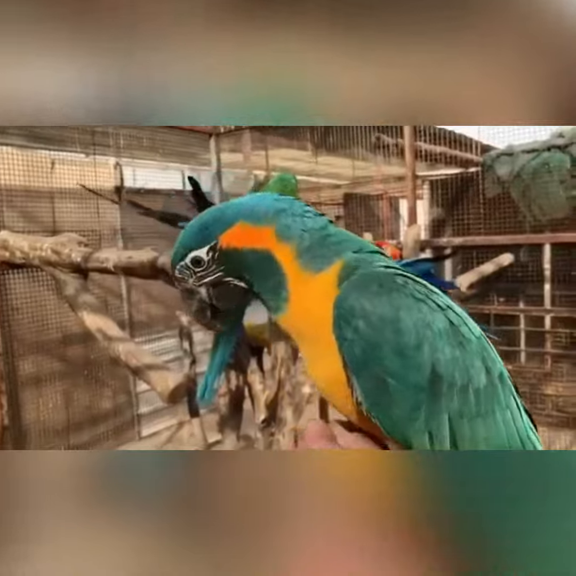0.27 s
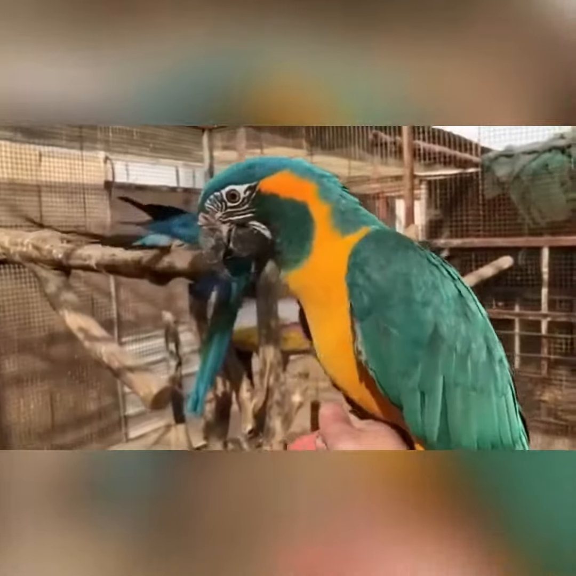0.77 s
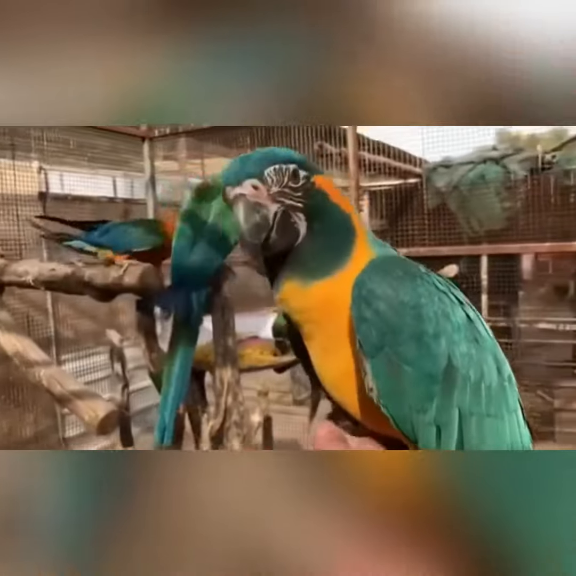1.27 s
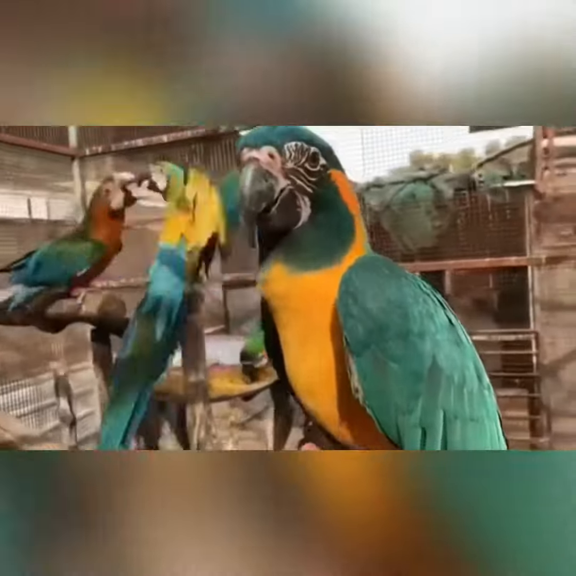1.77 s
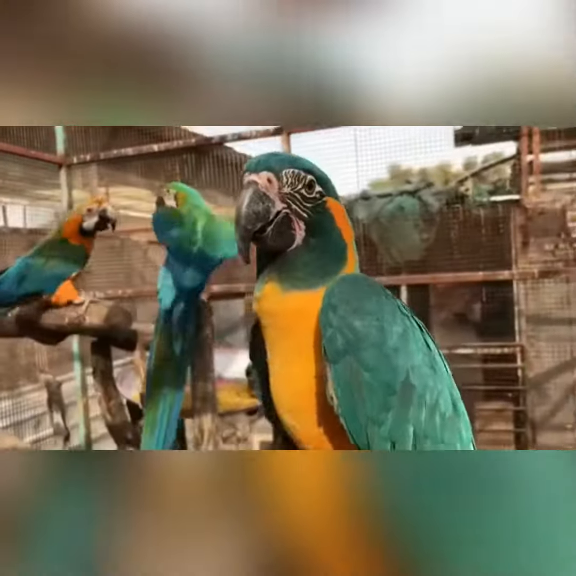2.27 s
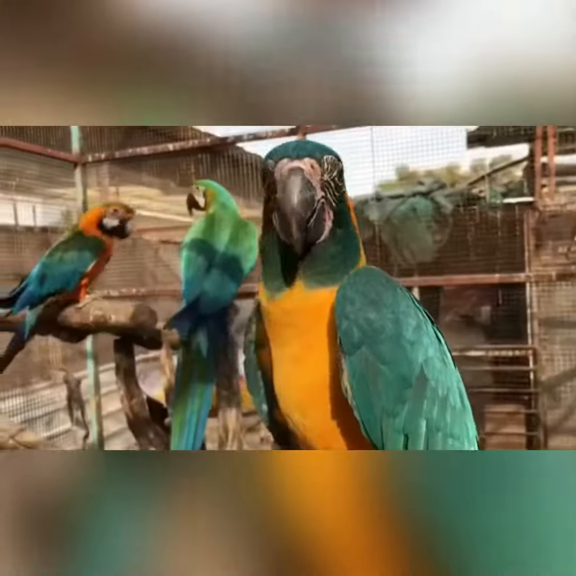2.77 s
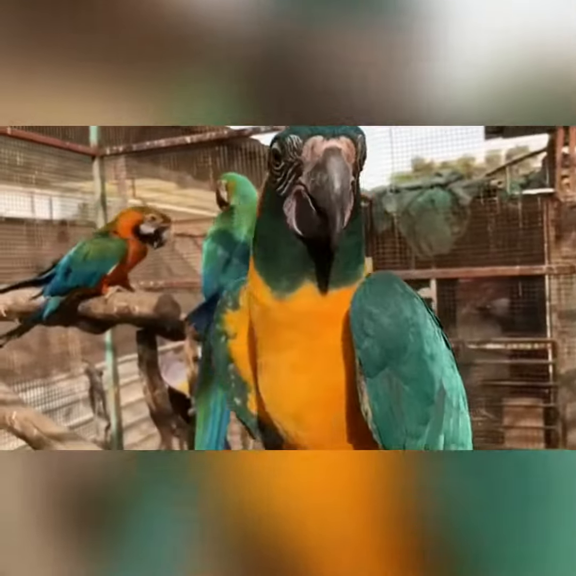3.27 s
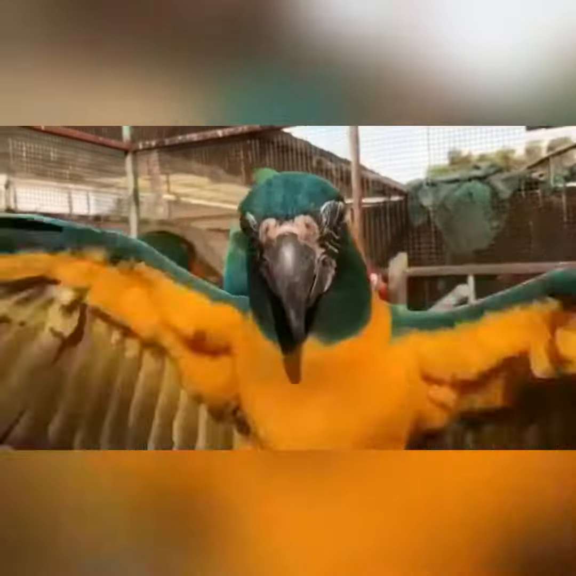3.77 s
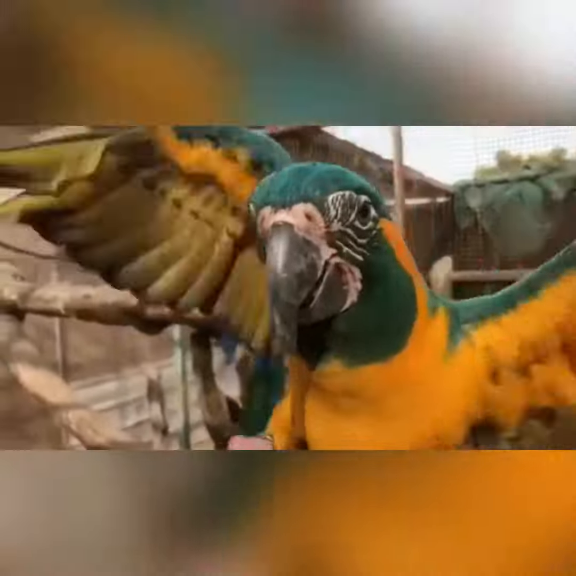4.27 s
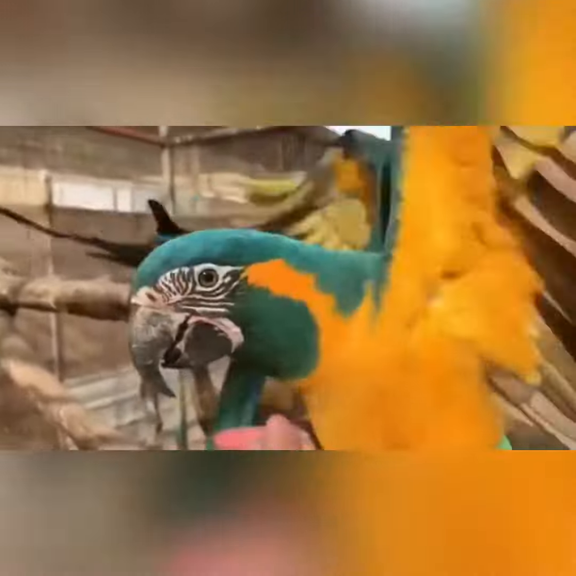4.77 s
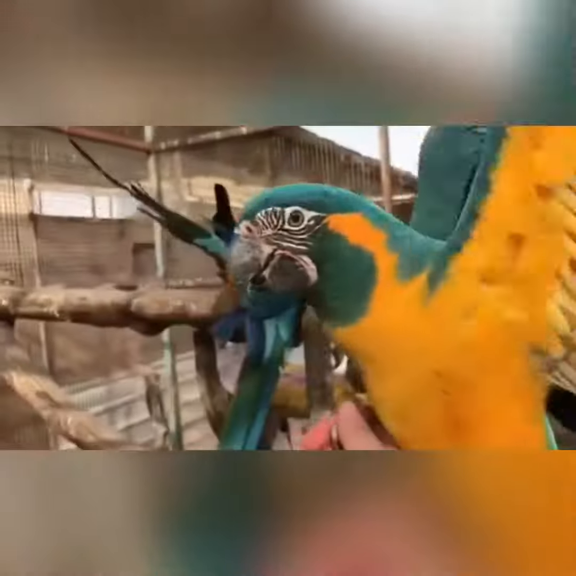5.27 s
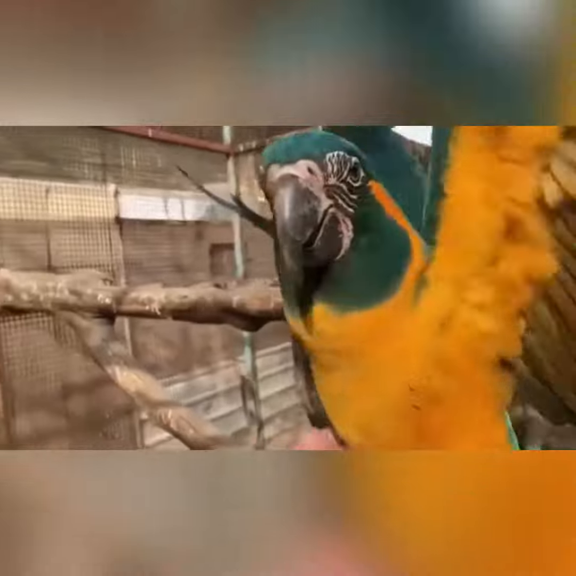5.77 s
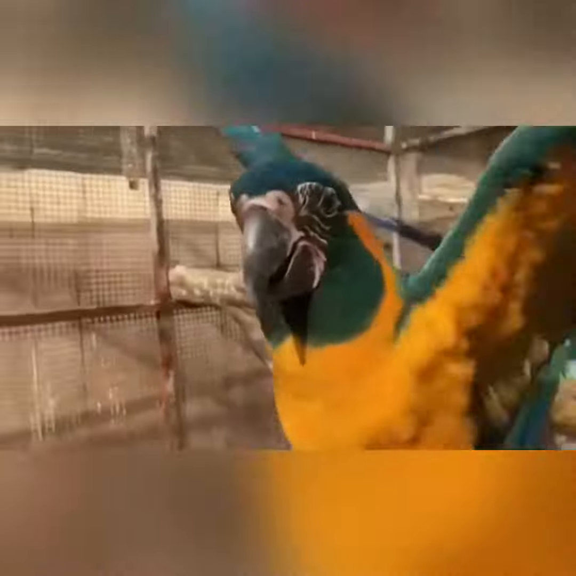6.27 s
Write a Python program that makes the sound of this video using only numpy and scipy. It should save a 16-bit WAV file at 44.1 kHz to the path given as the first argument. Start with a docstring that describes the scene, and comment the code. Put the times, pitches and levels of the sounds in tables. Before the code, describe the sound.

Gritty rubbing and faint airy hiss open with the tail of a far bird call. A large parrot near the microphone squawks twice, first throaty and climbing, then a piercing, cracking screech, both reflected by hard metal walls. Afterwards come uneven scuffs, brief far whistles, a soft low bump, a very sharp bright click with a thump, and thin rising chirps near the end.

```python
"""Gritty scraping, a faint hiss, low wind and a far bird call come first; far whistles join in.
A macaw close by then squawks twice: rough pulses and breath shaped by its throat, beak and skull.
Short noise bursts tick close by, and one sharp snap thumps the microphone with dying low swings.
Scrapes are dense random grains with brighter scuffs; far birds are wavering near-sines.
The birds echo in a wire and sheet-metal aviary: quick echoes, then a ringing tail."""
import sys
import numpy as np
from scipy import signal
from scipy.io import wavfile
from scipy.ndimage import uniform_filter1d

SR = 44100
rng = np.random.default_rng(int(sys.argv[2]) if len(sys.argv) > 2 else 0)


def transcribe(u):
    """Save the signal u as a 16-bit wav file named by the first command-line argument.

    u: samples, shape (n,) or (channels, n), limited to [-1, 1]; the rate is SR.
    q: integer samples, one column per channel.
    """
    v = np.clip(np.atleast_2d(u).T, -1, 1)
    q = np.round(v * 32767).astype(np.int16)
    wavfile.write(sys.argv[1], SR, q)


N = 286958

# Colour of the far hiss: (frequency [Hz], relative level per Hz [dB])
AIR_COLOUR = [(15, -31), (25, 9.5), (71, 8), (480, -9), (661, 0.5), (2370, -3), (2710, -11), (3830, -4),
              (8740, -39), (10500, -34), (13000, -13), (14500, -23)]
# Colour of the low wind and rumble: (frequency [Hz], relative level per Hz [dB])
WIND_COLOUR = [(15, -31), (25, -27), (48, -6.5), (102, -7), (151, -10), (260, -8), (400, -8.5), (520, -31),
               (880, -120)]
AIR_DB, WIND_DB = -48.5, -54
RUMBLE_DB = -10.5   # against the body of the scraping

# Strength of the scraping: (time [s], body level [dB], grit level [dB])
SCRAPE_LEVELS = [(0, -47.5, -47), (.3, -47.5, -60.5), (.65, -47, -48.5), (0.999, -41.5, -51),
                 (1.12, -63, -61.5), (1.35, -36, -47.5), (1.9, -62.5, -58), (2.09, -37, -38),
                 (2.23, -44.5, -48.5), (2.43, -48, -56), (2.65, -39.5, -43.5), (3.22, -37.5, -41),
                 (3.55, -47, -49.5), (3.82, -46.5, -57.5), (3.95, -37, -36.5), (4.1, -43, -47),
                 (4.75, -47, -47.5), (5.13, -36, -41.5), (5.46, -49, -51), (5.95, -79, -54),
                 (6.15, -42, -46), (6.5, -56.5, -55)]
# Colour of the dull body: (frequency [Hz], relative level per Hz [dB])
BODY_COLOUR = [(88, -41), (150, -10), (356, -14.5), (538, -4), (945, -3), (2100, 0), (2340, -2.5),
               (2840, -3), (4000, -5), (5200, -18), (8800, -120)]
# Colour of the bright grit: (frequency [Hz], relative level per Hz [dB])
GRIT_COLOUR = [(1470, -59), (2500, 3.5), (3030, -3), (5030, 1.5), (5870, -11.5), (7650, 5), (8670, -12.5),
               (13400, -13.5), (14500, -28)]
# Ringing tones in the scrape: (frequency [Hz], width [Hz], strength before wavering [dB])
SCRAPE_RINGS = [(944, 23, -6), (2315, 34, 4.5), (5980, 840, -8)]
# Scuffs, bright starts of a scrape: (time [s], nominal peak [dB], time to fall 60 dB [s], rise [s])
SCUFFS = [(0.72, -17.5, 0.49, 0.038), (1.2555, -32.5, 1, 0.015), (2.3, -20.5, 0.25, 0.034),
          (2.442, -26, 0.14, 0.011), (2.5885, -31.5, 0.34, 0.0059), (2.6963, -20, 0.29, 0.0057),
          (2.814, -26.5, 0.51, 0.0086), (2.889, -17.5, 0.2, 0.024), (3.2, -25.5, 0.18, 0.017),
          (3.6194, -35.5, 0.97, 0.013), (3.763, -33, 0.52, .008), (3.81, -31, 0.24, 0.0046),
          (4.196, -19, 0.38, 0.05), (4.859, -25, 0.19, .007), (4.9546, -31.5, 0.47, 0.0061),
          (5.0809, -25, 0.53, 0.013), (6.075, -22.5, 0.49, 0.0083)]
SCUFF_CREST_DB = 9   # a nominal peak stands this far above the average level
RING_WAVER_DB = 3.5

# Tail of a far call, before wavering: (time [s], lowest pitch [Hz], level [dB])
FAR_CALL = [(0, 1126, -42), (.03, 1235, -55.5), (.08, 1235, -64)]
# Tones stacked in the far call: (multiple of the pitch [-], added level [dB])
FAR_OVERTONES = [(1, 0.5), (2, 1.5), (3, -0.5)]
# Far whistles, before wavering: (start [s], turn [s], end [s], pitch at start [Hz], at turn [Hz],
# at end [Hz], level at turn [dB])
WHISTLES = [(0.113, .135, .18, 1917, 1730, 1670, -45), (.19, .235, .29, 3200, 3610, 3300, -46),
            (2.406, 2.471, 2.56, 1770, 1836, 1800, -46), (2.6, 2.63, 2.665, 1890, 1770, 1880, -46),
            (2.6, 2.622, 2.65, 3700, 3660, 3300, -43.5), (5.731, 5.774, 5.825, 2700, 3750, 2690, -43),
            (5.801, 5.824, 5.865, 2350, 2294, 2340, -49.5), (5.825, 5.86, 5.895, 3450, 3280, 3400, -54),
            (5.882, 6.023, 6.06, 3510, 5560, 5430, -48.5), (6.16, 6.322, 6.41, 4870, 6430, 6380, -49.5)]
WHISTLE_START_DB, WHISTLE_END_DB = -7, -11   # against the level at the turn

# Sheet metal ringing in the echo tail: (frequency [Hz], width [Hz], strength [dB])
ROOF_RINGS = [(978, 30, 6), (1690, 47, 8.5), (2164, 26, 7.5), (2560, 31, 6), (2780, 33.5, -7),
              (3540, 50, 8), (4650, 33, 9.5)]
EARLY_DB, EARLY_T60_S = -4, 0.15   # strength and time to fall 60 dB
LATE_DB, LATE_T60_S = -23.5, 1.12
FAR_WET_DB = 5   # far birds excite the room more than they are heard direct

# Ticks: (time [s], level before the fade [dB], centre [Hz])
TICKS = [(0.23, -27, 5000), (2.1166, -29, 5000), (4.6146, -17, 6770), (5.9718, -31, 10000),
         (6.324, -31.5, 10000)]
# Knocks near the microphone, the bright one is the snap:
# (time [s], level before the fade [dB], frequency [Hz], time to fall 60 dB [s])
THUMPS = [(3.49, -35, 260, .1), (4.6157, -19, 1296, 0.013), (4.6184, 3, 8000, .0006),
          (4.6195, -30, 170, .04), (4.6243, -22, 58, .09), (5.066, -33, 60, 0.09)]
TICK_T60_S = 0.021

# Two squawks, before dips and roughness: (time [s], pitch [Hz], level [dB], roughness [0-1],
# beak opening as second-resonance strength [dB], first resonance [Hz], second resonance [Hz])
SQUAWKS = [
    [(.305, 276.8, -53, .1, -12, 1400, 1750), (.325, 276.6, -31.5, 0.083, 0, 1250, 1650),
     (.35, 257, -29, 0.55, 0, 950, 1930), (.372, 291.2, -21, 0.83, -4, 1250, 1970),
     (.382, 275, -18, .25, -13, 1590, 2240), (.41, 329.2, -16, 0.26, -7, 1190, 2150),
     (.44, 375.6, -17, 0.4, -2.5, 1360, 2250), (.47, 430, -12.5, 0.41, -1, 1430, 2240),
     (.49, 434, -11, 0.15, -2, 1480, 2210), (.522, 403.1, -14, 0.21, -0.5, 1340, 2220),
     (.535, 426, -31, .4, 14, 1330, 2300), (.562, 416.7, -47, 0.32, 4, 1600, 2100)],
    [(1.41, 795.6, -45, 0.38, -15, 780, 1500), (1.423, 784, -24.5, 0.4, -14, 780, 1500),
     (1.44, 752.8, -12.5, 0.57, 5, 766, 1420), (1.455, 812, -15, 0.67, 3, 850, 1550),
     (1.48, 927.6, -10, 0.44, 8.5, 980, 1940), (1.52, 1013, -8.5, 0.56, 6.5, 1150, 2000),
     (1.562, 976, -11, 0.16, 17, 1390, 1840), (1.579, 963, -12.5, 0.86, 0, 1270, 1880),
     (1.592, 952, -29, 0.87, -18, 1200, 1900), (1.61, 940, -51, 0.72, 0, 1100, 1900)],
]
# Fixed skull resonances: (frequency [Hz], width [Hz], strength before each squawk's change [dB])
SKULL = [(750, 600, -11), (4500, 500, -12), (5700, 900, -20), (8200, 1500, -28), (12800, 2000, -26)]
# Change to the skull, a row a squawk: (strength [dB], tilt above 4.5 kHz [dB per octave])
SHRILL = [(-3, -4), (3, 2)]
# Bursts in the first squawk, each after a fade: (burst time [s], depth of the fade [dB])
CATCHES = [(0.376, 8), (.404, 19), (0.434, 27), (0.464, 10), (.489, 13.5)]
# Throat filter widths for one pass, a row a squawk: (first [Hz], second [Hz], third [Hz], fourth [Hz])
THROAT_WIDTHS = [(350, 460, 830, 960), (775, 1270, 1860, 330)]
# Third and fourth throat resonance, a pair of rows a squawk: (start [Hz], end [Hz])
UPPER_GLIDES = [
    [(3400, 3540), (4650, 4610)],
    [(3400, 3350), (5100, 6400)],
]
# Time the upper pair takes to glide, an entry a squawk: (time [s])
UPPER_GLIDE_TIMES = [0.16, 0.083]
# Strength of the upper pair at opening 0, before the fourth is lowered: (level [dB])
UPPER_LEVELS = [-3.5, -1]
# Strength lost by every second pulse outside the voice break, an entry a squawk: (share [0-1])
WEAK_PULSES = [0, 0.19]
UPPER_FOLLOWS, FOURTH_DB = .6, -4   # share of the opening; fourth resonance against the third
SAG, SAG_S, CATCH_FADE_S = .12, 0.031, 0.011   # share the pitch sinks before a burst; times
BREAK_S, BREAK_END_S, BREAK_LIFT = 1.524, 1.564, 1.25   # voice break; jump of the second resonance

NOTCH_HZ, NOTCH_WIDTH_HZ, NOTCH_SHARE = 2708, 136, 0.35
CUTOFF_HZ = 14700


def from_db(db):
    """Turn a level in dB into a gain."""
    return 10 ** (np.asarray(db) / 20)


def rms_one(x):
    """Scale a sound to an average (rms) strength of 1."""
    return x / np.sqrt(np.mean(x ** 2) + 1e-20)


def in_time(rows):
    """Draw a table as smooth curves; return the first sample and one curve a column."""
    s, *columns = np.transpose(rows)
    first = int(s[0] * SR)
    t = np.arange(first, min(N, int(s[-1] * SR))) / SR
    return first, [np.interp(t, s, column) for column in columns]


def drift(rate, size=N):
    """Wander by chance: noise at every 8th sample, smoothed twice up to about rate Hz; spread 1."""
    r = np.exp(-16 * np.pi * rate / SR)
    noise = rng.standard_normal(size // 8 + 1002)
    slow = signal.lfilter([1], [1, -2 * r, r * r], noise)[1000:]   # drop the filter's run-in
    return np.interp(np.arange(size) / 8, np.arange(len(slow)), rms_one(slow))


def poles(hz, width_hz):
    """Make the filter of a resonance with gain 1 on top."""
    r = np.exp(-np.pi * width_hz / SR)
    return (1 - r * r) / 2 * np.array([1, 0, -1]), [1, -2 * r * np.cos(2 * np.pi * hz / SR), r * r]


def moving_resonance(x, hz, width_hz):
    """Filter with a resonance whose centre is updated every 64 samples."""
    out, state = np.zeros(len(x)), np.zeros(2)
    for i in range(0, len(x), 64):
        out[i:i + 64], state = signal.lfilter(*poles(hz[i], width_hz), x[i:i + 64], zi=state)
    return out


def coloured(source, spectrum, patchy_db, rate):
    """Build noise from third-octave bands, each at its level and with its own flicker; rms 1."""
    hz, level_db = np.transpose(spectrum)
    edges = hz[0] * 2 ** np.arange(0, np.log2(hz[-1] / hz[0]) + 1 / 3, 1 / 3)
    out = 0
    for k, (low, high) in enumerate(zip(edges, edges[1:])):
        band_filter = signal.butter(2, [low, high], "band", fs=SR, output="sos")
        band = signal.sosfilt(band_filter, source[k % 2])[-N:]   # neighbours use different noise
        band_db = np.interp(np.log(low * high) / 2, np.log(hz), level_db)
        out = out + band * from_db(band_db + patchy_db * drift(rate))
    return rms_one(out)


def background():
    """Steady far hiss, lumpy low wind, and a rumble that rises and falls with the scraping."""
    s, body_db, _ = np.transpose(SCRAPE_LEVELS)
    low = coloured(rng.standard_normal((2, N + SR // 4)), WIND_COLOUR, patchy_db=3.0, rate=4.4)
    air = coloured(rng.standard_normal((2, N + SR // 4)), AIR_COLOUR, patchy_db=2.0, rate=0.4)
    rumble = from_db(np.interp(np.arange(N) / SR, s, body_db) + RUMBLE_DB)
    both = from_db(AIR_DB) * air + np.hypot(from_db(WIND_DB), rumble) * low
    # the deepest bass is lost
    return signal.sosfilt(signal.butter(6, 38, "high", fs=SR, output="sos"), both)


def scraping():
    """Dense grains of uneven size ring a dull body and a bright gritty layer; scuffs kick both up."""
    grain_db = 2.54 * np.minimum(rng.exponential(1, (2, N)), 5)
    grains = rng.standard_normal((2, N)) * from_db(grain_db)
    s, body_db, grit_db = np.transpose(SCRAPE_LEVELS)
    t, kicks = np.arange(N) / SR, np.zeros(N)
    for at, db, t60, rise in SCUFFS:
        since = np.maximum(t - at, 0)
        kicks += from_db(db - SCUFF_CREST_DB - 60 * since / t60) * np.minimum(since / rise, 1)
    body = coloured(grains, BODY_COLOUR, patchy_db=2.0, rate=18.0)
    body *= from_db(np.interp(t, s, body_db)) + 0.43 * kicks
    grit = coloured(grains[::-1], GRIT_COLOUR, patchy_db=2.0, rate=20)
    grit *= from_db(np.interp(t, s, grit_db)) + kicks
    scrape = body + grit
    rings = sum(from_db(db + RING_WAVER_DB * drift(1)) * signal.lfilter(*poles(hz, width_hz), scrape)
                for hz, width_hz, db in SCRAPE_RINGS)
    return scrape + rings


def whistles():
    """Near-sines blurred by a quick waver in pitch and level; the far call is a stack of them."""
    out = np.zeros(N)
    notes = [(FAR_CALL, multiple, db) for multiple, db in FAR_OVERTONES]
    for s, turn, end, start_hz, turn_hz, end_hz, db in WHISTLES:
        rows = [(s, start_hz, db + WHISTLE_START_DB), (turn, turn_hz, db), (end, end_hz, db + WHISTLE_END_DB)]
        notes.append((rows, 1, 0))
    for rows, multiple, db in notes:
        first, (hz, level_db) = in_time(rows)
        n = len(hz)
        wavering_hz = multiple * hz * (1 + 0.019 * drift(82, size=N // 20)[:n])
        tone = np.sqrt(2) * np.sin(2 * np.pi * np.cumsum(wavering_hz) / SR)   # rms 1
        loudness = from_db(db + level_db + 3 * drift(70, size=N // 20)[:n])
        out[first:first + n] += tone * loudness * signal.windows.tukey(n, .2)   # soft ends
    return out


def aviary(x):
    """Quick echoes from near walls, then a longer, duller tail in which sheet metal rings."""
    t = np.arange(SR) / SR
    early = rng.standard_normal(SR) * from_db(-60 * t / EARLY_T60_S) * (t > .004)
    dull_noise = signal.lfilter(*signal.butter(1, 4500, fs=SR), rng.standard_normal(SR))
    late = dull_noise * from_db(-60 * t / LATE_T60_S) * (t > .02)
    late += sum(from_db(db) * signal.lfilter(*poles(hz, width_hz), late) for hz, width_hz, db in ROOF_RINGS)
    reply = from_db(EARLY_DB) * early / np.linalg.norm(early)
    reply += from_db(LATE_DB) * late / np.linalg.norm(late)
    return signal.fftconvolve(x, reply)[:N]


def knocks():
    """Ticks are tiny bursts of noise, the snap one bright swing, thumps dying low swings."""
    out = np.zeros(N + SR)
    t = np.arange(SR // 5) / SR
    for s, db, hz in TICKS:
        burst = signal.lfilter(*poles(hz, 13000), rng.standard_normal(len(t)))
        out[round(s * SR):][:len(t)] += from_db(db - 60 * t / TICK_T60_S) * burst
    for s, db, hz, t60 in THUMPS:
        out[round(s * SR):][:len(t)] += from_db(db - 60 * t / t60) * np.sin(2 * np.pi * hz * t)
    return out[:N]


def squawk(rows, widths_hz, shrill, upper_hz, glide_s, upper_db, weak_pulse):
    """Jittered pulses of the voice membranes, with breath noise each cycle, through the throat."""
    first, (pitch, level_db, rough, opening_db, first_hz, second_hz) = in_time(rows)
    n, rough = len(pitch), np.clip(rough, 0, 1)
    t = (first + np.arange(n)) / SR

    # the voice breaks: every second pulse drops out and the second resonance jumps
    broken = uniform_filter1d(1. * (t > BREAK_S) * (t < BREAK_END_S), size=260)
    weak = weak_pulse + (1 - weak_pulse) * broken
    upper_centres = [np.interp(t - t[0], [0, glide_s], ends) for ends in upper_hz]
    centres = [first_hz, second_hz * BREAK_LIFT ** broken] + upper_centres

    # pitch and level sink before each burst, then spring back
    for s, depth_db in CATCHES:
        ahead = s - t
        pitch = pitch * (1 - SAG * np.clip(1 - ahead / SAG_S, 0, 1) * (t < s))
        fade = np.clip(1.3 - ahead / CATCH_FADE_S, 0, 1) * np.clip(ahead / 0.00065, 0, 1)
        level_db = level_db - depth_db * fade

    cycles = np.cumsum(pitch * (1 + .06 * rough * drift(250, size=n))) / SR
    count = cycles.astype(int)
    strength = from_db(6 * rough * np.clip(rng.standard_normal(400), -2, 1.5)[count])
    strength *= 1 - np.clip(weak, 0, 1) * (count % 2)
    # one narrow smooth pulse a cycle
    samples_from_middle = (cycles % 1 - .5) * SR / pitch
    pulses = np.exp(-np.square(samples_from_middle / 1.38)) * np.sqrt(SR / pitch)
    # breath starts at each pulse and thins out until the next
    breath = rng.standard_normal(n) * (1 - (cycles + .5) % 1)
    source = strength * (pulses * (1 - rough) + 2.4 * rough * breath)

    upper_db = upper_db + UPPER_FOLLOWS * opening_db
    gains_db = [0, opening_db, upper_db, upper_db + FOURTH_DB]
    voice = np.zeros(n)
    for k, (hz, width_hz, db) in enumerate(zip(centres, widths_hz, gains_db)):
        once = moving_resonance(source, hz, width_hz)
        voice += (-1) ** k * from_db(db) * moving_resonance(once, hz, width_hz)
    for hz, width_hz, db in SKULL:
        skull_db = db + shrill[0] + shrill[1] * np.log2(max(hz / 4500, 1))
        voice += from_db(skull_db) * signal.lfilter(*poles(hz, width_hz), source)
    # a small beak radiates no bass
    voice = signal.sosfilt(signal.butter(6, 500, "high", fs=SR, output="sos"), voice)
    voice /= np.sqrt(uniform_filter1d(voice ** 2, size=600) + 1e-9)   # effort alone sets the level
    out = np.zeros(N)
    out[first:first + n] = voice * from_db(level_db)
    return out


def scene():
    """Add all sources, with echoes of the macaw and the far birds in the aviary."""
    calls = zip(SQUAWKS, THROAT_WIDTHS, SHRILL, UPPER_GLIDES, UPPER_GLIDE_TIMES, UPPER_LEVELS, WEAK_PULSES)
    macaw = sum(squawk(*call) for call in calls)
    far = whistles()
    echoes = aviary(macaw + from_db(FAR_WET_DB) * far)
    return (macaw + far + echoes + scraping() + knocks() + background())[None]


def record(dry):
    """The microphone dips at one pitch, peaks are flattened, the top is cut."""
    notched = dry - NOTCH_SHARE * signal.lfilter(*poles(NOTCH_HZ, NOTCH_WIDTH_HZ), dry)
    rounded = notched / (1 + np.abs(notched / .97) ** 4) ** .25
    return signal.sosfilt(signal.cheby2(14, 70, CUTOFF_HZ, fs=SR, output="sos"), rounded)


dry = scene()
out = record(dry)
transcribe(out)
```